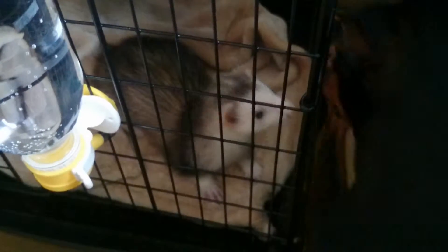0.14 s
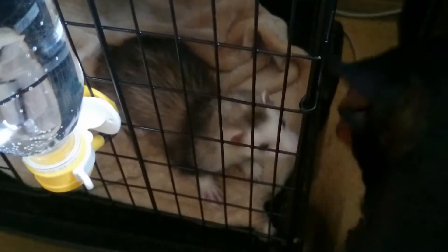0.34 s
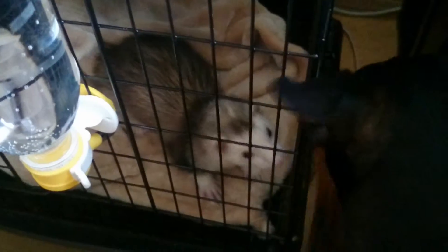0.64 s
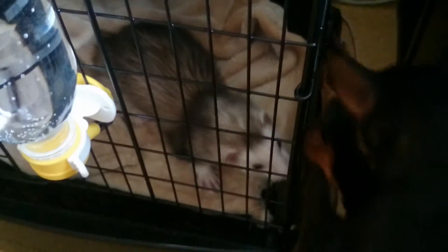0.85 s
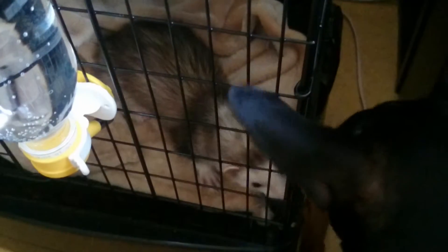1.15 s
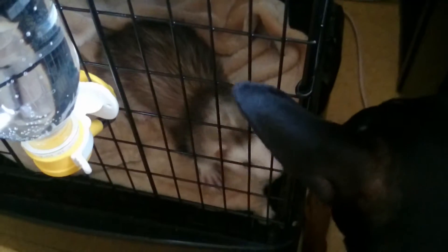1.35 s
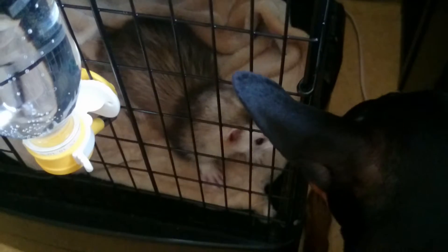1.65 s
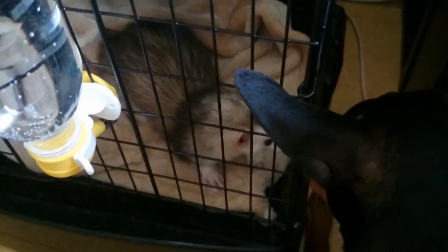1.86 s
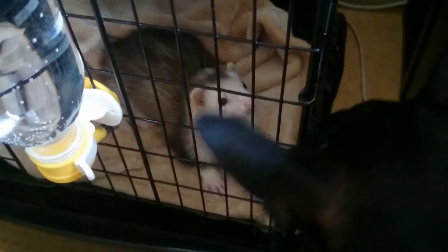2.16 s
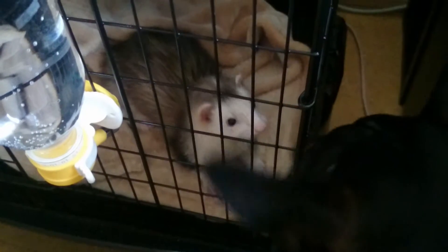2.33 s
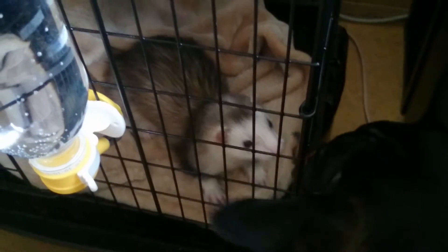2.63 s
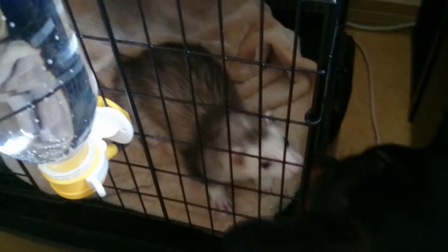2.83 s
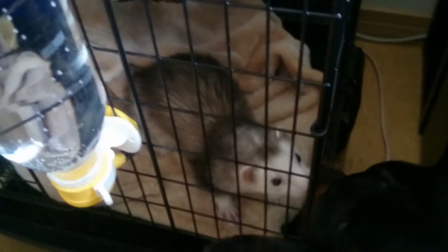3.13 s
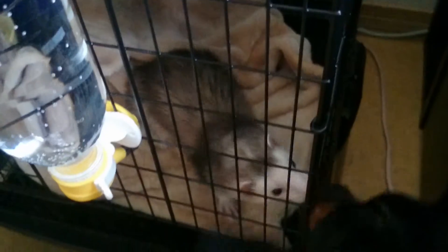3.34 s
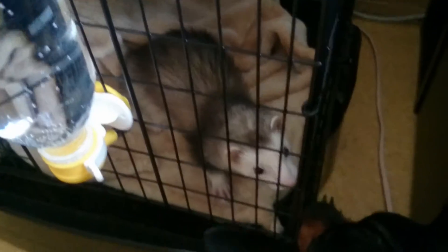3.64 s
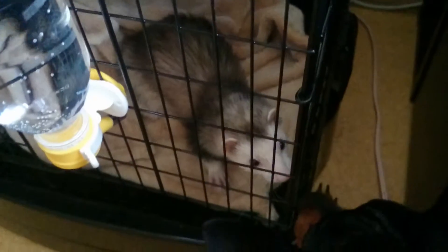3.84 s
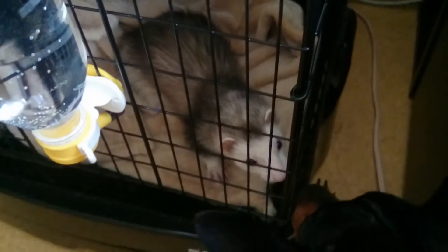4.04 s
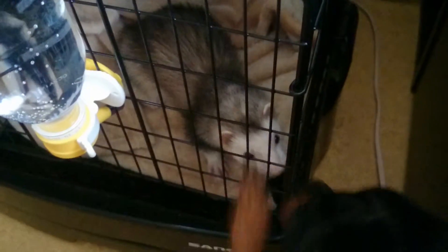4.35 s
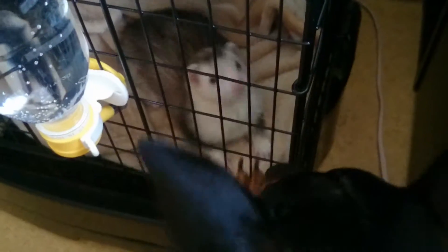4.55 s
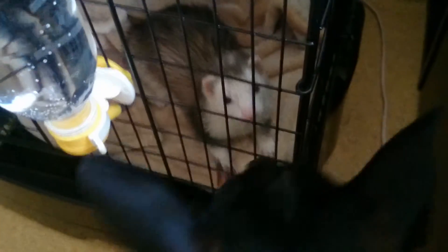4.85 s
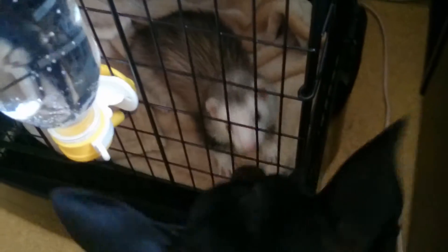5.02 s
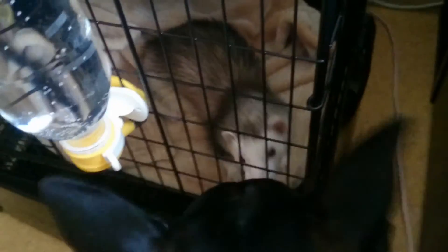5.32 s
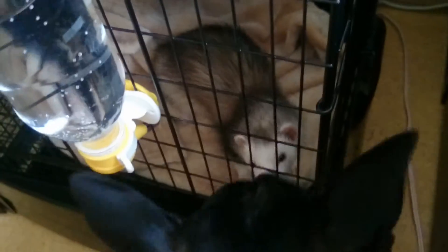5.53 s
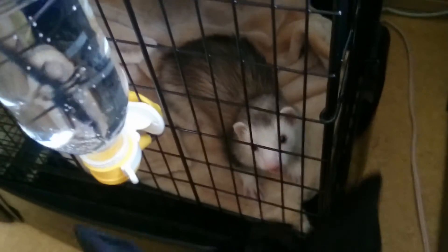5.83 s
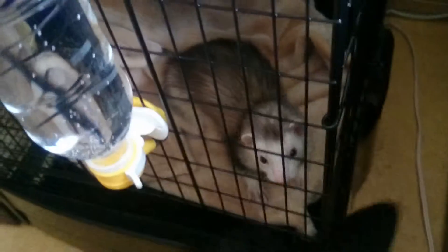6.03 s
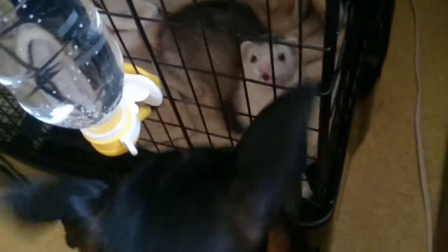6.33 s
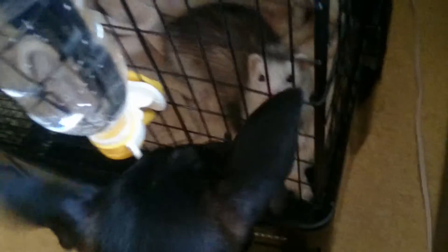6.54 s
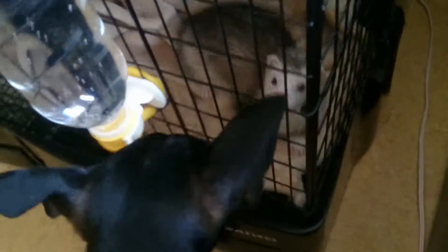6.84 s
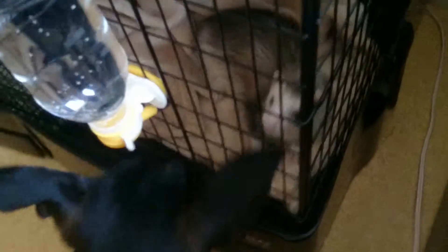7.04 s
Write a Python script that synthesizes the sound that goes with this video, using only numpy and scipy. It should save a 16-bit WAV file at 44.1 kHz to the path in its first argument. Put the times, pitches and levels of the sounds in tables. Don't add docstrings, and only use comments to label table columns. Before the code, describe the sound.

In a small hard room a dog paws and noses at a wire cage on a plastic tray, heard closely through a handheld phone with low grip rumble and faint hiss. From 0 to 0.8 seconds, sharp ticks and small clinks scatter over soft thuds. Around 1.1 a firmer knock and scrape leaves a faint wire ring, then it quietens. At 2.1 a bright, hard rattle cracks out, followed by a swish of fur and a low bump near 2.6. Soft nose puffs come between 2.7 and 3.3. A dense crackling clatter hits at 3.4 to 3.7, then a lull with faint scratches. From 4.5 ticks, scrapes and thuds return, with a bright burst at 5.3 and scattered clicks until 5.9. After a brief pause, another sharp rattle at 6.4, a firm bump at 6.65, then rubbing, thumps and ticks to about 7.2.

```python
import sys
import numpy as np
from scipy import signal
from scipy.fft import rfft, irfft
from scipy.io import wavfile
from scipy.ndimage import uniform_filter1d

SR = 44100
rng = np.random.default_rng(int(sys.argv[2]) if len(sys.argv) > 2 else 0)


def ratio_of_db(decibels):
    return 10 ** (np.asarray(decibels, float) / 20)


def digitize_waveform(pressure):
    field = np.atleast_2d(pressure).T
    bounded = np.clip(field, -1, 1)
    quanta = np.round(bounded * 32767).astype(np.int16)
    wavfile.write(sys.argv[1], SR, quanta)


N = 316638

# time in seconds, level in dB.
GRIP_LEVELS = [(0, -48.5), (.4, -56), (.96, -44.5), (1.24, -45), (1.54, -57.5), (1.9, -59.5), (2.22, -42.5),
               (2.54, -56.5), (2.9, -45.5), (3.3, -55), (3.72, -45.5), (3.86, -51), (4.76, -54),
               (5.0, -46.5), (5.5, -49), (6.1, -48.5), (6.46, -44.5), (7.18, -51)]
# pitch in Hz, time to fall 60 dB in seconds.
ROOM_DECAY = [(200, 0.58), (530, 0.26), (1390, 0.32), (3680, 0.31), (9700, 0.28)]
# pitch in Hz, gain in dB.
WALL_GAIN = [(200, 7), (1500, 3.5), (5600, 1), (8500, -2.5), (14000, -5.5)]
# pitch in Hz, gain in dB.
LEFT_PORT = [(30, -12.5), (300, -2), (1000, -2.5), (3000, -4), (6900, -1), (7900, 6), (9000, 6),
             (10500, -7), (12500, -9.5), (13600, -14.5), (14400, -16.5), (15500, -20.5)]
RIGHT_PORT = [(30, -7.5), (300, -1.5), (1000, -2), (3000, -2.5), (4800, 1.5), (5500, 7), (6100, 7),
              (6700, -4.5), (7700, -14.5), (10000, -20.5), (13300, -29.5), (15500, -24)]
# pitch in Hz, level in dB.
LEFT_HISS = [(30, -54.5), (200, -63.5), (1000, -77), (4000, -87.5), (6900, -82.5), (8000, -72), (9400, -82),
             (10000, -86.5), (12100, -72.5), (13500, -79.5), (15500, -96)]
RIGHT_HISS = [(30, -71), (200, -62.5), (1000, -73), (3000, -80), (6500, -86.5), (7200, -91.5),
              (13000, -86.5), (15500, -89.5)]
# start in seconds, level in dB, pitch in Hz, 60 dB decay in seconds.
WIRE_RINGS = [
    (.854, -52, 985, .3),
    (1.075, -51.5, 985, 1.0),
    (4.72, -58, 990, .3),
]
# start in seconds, level in dB, length in seconds, tray share in dB.
THUDS = [(0.132, -42, 0.026, 1), (0.254, -37.5, 0.039, -2.5), (0.426, -30.5, 0.031, -2),
         (0.488, -45.5, 0.026, 10), (.854, -34, 0.02, 1), (1.053, -26.5, 0.038, 4),
         (2.003, -53, 0.023, -24.5), (2.127, -44, 0.014, -14), (2.229, -39.5, 0.046, -14.5),
         (2.882, -40.5, 0.03, -13.5), (3.067, -43.5, 0.027, -2.5), (3.308, -36.5, 0.04, -2),
         (3.406, -31.5, 0.037, -18), (3.443, -32.5, 0.021, -5), (3.648, -39, 0.035, 0.5),
         (4.605, -44, 0.029, -6.5), (4.708, -44, 0.022, -1.5), (4.897, -37.5, 0.082, -5.5),
         (4.95, -37, 0.019, -2.5), (5, -29.5, 0.023, -7.5), (5.058, -44, 0.079, -1.5),
         (5.119, -38, 0.018, -5), (5.329, -30, 0.029, 4), (5.652, -31, 0.032, -9),
         (5.894, -36.5, 0.018, -4.5), (6.269, -37.5, 0.016, -6), (6.411, -28, 0.017, -3.5),
         (6.799, -35, 0.029, -10), (7, -33.5, 0.067, -47), (7.097, -29.5, 0.07, -15)]
# pitch in Hz, width in Hz, level in dB.
TRAY_MODES = [(333, 78, -6), (462, 130, -11), (790, 29, 1.5), (940, 61, -11)]
# start in seconds, level in dB, left over right in dB.
BUMPS = [
    (2.583, -21, -4),
    (5.969, -39.5, -23.5),
    (6.653, -25.5, -6),
]
# pitch in Hz, level in dB, 60 dB decay in seconds.
FLOOR_MODES = [(61.5, 15, 0.15), (190, 4, 0.1), (302, -5, 0.086), (470, 2, 0.075), (600, -8.5, 0.06)]
# start in seconds, hold in seconds, fur hiss in dB, pad drag in dB,
# fine-hair sheen over the hiss in dB.
RUBS = [(0, 0.0031, -37, -48.5, -7), (0.197, 0.09, -63, -42.5, -.5), (0.393, 0.095, -40, -65, -.5),
        (.86, 0.25, -54, -61, -.5), (1.086, 0.043, -61, -41, -.5), (2.233, 0.087, -22.5, -42, 2.5),
        (2.358, 0.13, -32, -46, -0.5), (2.55, 0.076, -60, -57, -2), (2.724, 0.53, -56, -54.5, 0),
        (3.369, 0.17, -35, -44, 7), (3.6, 0.033, -68, -59, -.5), (3.896, 0.96, -72, -64.5, 2),
        (4.602, 0.091, -56, -47, -.5), (4.694, 0.2, -42, -64, 1), (4.873, 0.087, -28.5, -40, -9),
        (5.034, 0.45, -69, -48.5, -3), (5.437, 0.15, -54, -41, -.5), (5.67, 0.11, -32, -37.5, 3),
        (5.845, 0.093, -42, -49, -4), (6.0, 0.25, -71, -61, 0), (6.243, 0.034, -62, -67, -.5),
        (6.324, .12, -62, -44, -.5), (6.438, 0.016, -51, -29.5, -.5), (6.512, 0.028, -70, -38, -.5),
        (6.646, 0.11, -35, -42.5, 4), (6.8, 0.064, -28.5, -40, -2), (6.902, 0.26, -41.5, -44, 1),
        (7.128, 0.058, -27, -38, 0)]
# start in seconds, blow in dB, low share in dB, top share in dB,
# length in seconds.
SNIFFS = [
    (2.702, -40, -10.5, -9, 0.033),
    (2.866, -42, -13.5, -6.5, 0.049),
    (3.049, -41, -5, -17, 0.035),
    (3.296, -41.5, -6.5, -4.5, 0.023),
    (4.46, -45.5, -12.5, -17, 0.073),
]
# pitch in Hz, width in Hz.
NOSTRIL_GAPS = [(1700, 630), (3200, 540), (4650, 500)]
# start in seconds, level in dB, panel pitch in Hz,
# length in seconds.
PANEL_RAPS = [
    (.5, -42, 1360, 0.0083),
    (0.855, -35, 960, 0.014),
    (1.065, -24.5, 946, 0.032),
    (2.122, -21, 1460, 0.0047),
    (3.442, -33, 934, 0.015),
    (3.655, -25, 1475, 0.0079),
    (4.725, -34, 1030, 0.061),
    (5.32, -24.5, 790, 0.005),
    (5.66, -30.5, 865, 0.014),
]
# start in
# seconds, level in dB, pitch in Hz, length in seconds.
SMALL_KNOCKS = [(.046, -48, 570, 0.0098), (.063, -43, 5300, 0.0066), (.075, -47, 690, 0.018),
                (.105, -52, 650, 0.013), (.136, -41, 2500, .005), (.172, -58, 510, .012),
                (.243, -40, 2420, 0.0042), (.260, -15, 3500, 0.0046), (.441, -26, 8500, .003),
                (.467, -24, 11000, .003), (.476, -13, 6000, 0.0036), (.494, -20, 8340, .003),
                (.728, -46, 5750, .003), (.853, -29.5, 2480, 0.0051), (1.069, -31, 9500, 0.0023),
                (1.093, -36, 5800, 0.0052), (1.103, -28.5, 480, 0.011), (1.28, -56, 520, .05),
                (2.143, -9, 5800, 0.0077), (2.165, -41.5, 483, .012), (2.226, -23.5, 8450, .006),
                (2.268, -20, 8160, 0.012), (2.604, -52, 8000, .004), (3.298, -48, 486, 0.011),
                (3.418, -39, 2980, .004), (3.457, -11, 5650, 0.0037), (3.467, -18, 5600, .003),
                (3.476, -18, 5460, .003), (3.487, -25, 5640, .005), (3.502, -30, 5600, .003),
                (3.605, -25, 992, 0.0092), (3.677, -17, 5900, 0.0031), (3.762, -26.5, 3860, 0.0033),
                (5.324, -11, 9060, 0.0054), (5.364, -27, 5700, .004), (5.412, -41, 2500, .005),
                (5.552, -37, 1210, 0.0087), (5.757, -16.5, 9600, .006), (5.830, -18, 2430, 0.0075),
                (6.409, -19, 8700, 0.0044), (6.419, -12.5, 8700, 0.0055), (6.448, -38, 535, .012),
                (6.452, -10.5, 5700, 0.0034), (6.704, -45, 2800, .005), (6.988, -28, 2350, 0.0044),
                (7.076, -32, 9500, .002), (7.100, -36, 4000, 0.0035), (7.155, -47, 550, .012),
                (0.263, -26, 1000, .01), (0.753, -41, 1310, .01), (.856, -22, 1026, .02),
                 (1.081, -25.5, 1020, 0.022), (1.314, -53, 2300, .04), (2.866, -45.5, 5590, 0.093),
                 (2.702, -43, 5800, .05), (3.055, -38, 5230, .06), (3.5, -36, 203.3, .06),
                 (3.69, -29, 2090, 0.024), (3.7, -39.5, 4300, .03), (4.255, -56, 1380, 0.017),
                 (4.942, -29.5, 985, 0.032), (5.312, -10, 9340, 0.0097), (5.648, -33.5, 186, 0.0075),
                 (5.675, -38, 300, 0.0084), (5.7, -48, 220, 0.014), (5.91, -52.5, 498, .015),
                 (6.656, -38.5, 345, 0.0096), (7.105, -36.5, 306, .015), (0.49, -17.5, 3120, 0.0068),
                 (.772, -33.5, 1750, .01), (0.776, -32, 2724, .01), (0.856, -27, 2550, .006),
                 (2.881, -43, 2390, .05), (3.1, -46, 2500, .09), (3.08, -44.5, 3960, 0.082),
                 (3.665, -33, 1490, 0.017), (4.363, -44, 7100, .0015), (4.736, -25, 2380, 0.018),
                 (5.334, -34, 765, 0.014), (5.903, -25, 4970, .002), (5.904, -39, 9600, .002),
                 (6.272, -39, 2970, .003), (6.87, -46, 4700, 0.028), (6.913, -45, 9000, .003),
                 (6.96, -28, 8800, .012), (7.162, -40, 9000, .002),
                (4.262, -49, 964, 0.014), (4.264, -45, 2700, .012), (4.266, -53, 3450, .01),
         (4.298, -49, 5600, .02), (4.31, -54, 9500, .0015), (4.8, -42, 3500, .002), (4.8, -46, 3000, .02),
         (3.432, -10.5, 3800, .002), (3.433, -19, 8100, .003), (3.442, -18, 3200, .004),
         (3.44, -24.5, 1000, 0.013), (3.7, -36, 2150, 0.034), (3.62, -38.5, 910, 0.031),
         (.452, -20, 5600, .003), (0.44, -18, 3700, .007), (6.83, -26, 4700, .02),
         (6.795, -22, 8100, 0.013), (6.91, -42, 12000, .0015), (6.988, -40, 9000, .002),
         (2.134, -20, 10500, 0.0027), (2.87, -55, 4700, 0.036), (2.2, -48, 2500, .03),
         (2.584, -44, 1320, .002), (5.322, -32, 201, 0.044), (5.335, -30, 480, .01)]
SHARE_HZ = [1600, 5600, 8500, 13000]
USUAL_DB = [7.73, 2.26, 1.4, 17.6]
# pitch in Hz, width in Hz, level in dB.
TRAY_WALL_MODES = [(993, 180, 2.5), (2300, 480, -2.5)]
# start in seconds, blow in dB, tray share in dB,
# length in seconds.
WIRE_SCRAPES = [(0.262, -35, 9, 0.0017), (0.426, -41, 5, 0.0065), (0.851, -36.5, 9, 0.005),
                (3.455, -17, -53, 0.016), (4.235, -52, -15, 0.044), (4.261, -48.5, -2, 0.0054),
                (4.302, -52, -12, 0.0033), (4.718, -26, -16, 0.0096), (4.734, -25.5, -13, 0.011),
                (6.194, -50.5, 0.5, 0.066), (6.254, -45.5, -12, 0.01), (6.691, -37, -1, 0.0089)]
FRAME_SCRAPES = [(.24, -32.5, -2.5, 0.0031), (0.39, -49, 10, 0.0095), (1.06, -28.5, -0.5, 0.012),
                 (1.09, -30.5, 0, 0.0026), (2.031, -59.5, -8, 0.02), (2.24, -29.5, -21, 0.019),
                 (3.381, -35.5, -16.5, 0.037), (3.604, -46, 6.5, 0.0064), (4.933, -44.5, 0.5, 0.024),
                 (5.31, -37, -11.5, 0.0057), (5.325, -18, -12, 0.018), (5.646, -43, 1, 0.013),
                 (5.752, -32, -23, 0.0047), (6.403, -37, -24, 0.0096), (6.424, -17.5, -7, 0.0069)]
# wire share in dB, claw-tip share in dB.
SCRAPE_SHARES_DB = [(2, -8.5), (-4, -8)]
# time of the top in seconds, blow in dB,
# tray share in dB, wire share in dB, room share in dB.
WIRE_TICKS = [(0.2589, -19.5, -22, 4.5, -2.5), (0.4998, -17.5, -6.5, 4, -3.5), (0.7714, -36, -5, 5, -1),
              (1.074, -14.5, -17, -1, -0.5), (1.1429, -28, -5, 12, -10.5), (3.432, -12, -11, 1.5, 0),
              (3.444, -13.5, -8.5, 5.5, -11.5), (3.76, -43, -2, 18.5, -7.5), (4.3649, -49.5, -5, 14, -8),
              (4.726, -33.5, -9, 13.5, -1.5), (5.834, -29, -5, 6.5, -1), (5.905, -35.5, -2, 20.5, -10.5),
              (6.4128, -15.5, -12.5, 4, 1), (7.0603, -32, -7, 2, -5.5)]
TIP_TICKS = [(0.4386, -16.5, -10, -4, -4.5), (0.452, -13, -20, -1, -0.5), (1.0589, -30.5, -18, 6.5, -4),
             (2.121, -12, -20, 2, -1.5), (2.1461, -16.5, -15.5, 2, 1), (3.6535, -11, -13.5, 1.5, -2.5),
             (4.497, -26, -27, -4.5, 2), (4.6163, -33.5, -7, -2, 1), (4.8343, -34.5, -10, -5, 1.5),
             (5.011, -27.5, -16, -3.5, 4), (5.0769, -30.5, -11, 2, -0.5), (5.318, -18, -19, 2, 1.5),
             (5.4208, -23, -9.5, 0.5, -0.5), (5.442, -21.5, -11.5, -3.5, -5), (5.5288, -26.5, -43, 0.5, 5),
             (5.662, -27.5, -16.5, -0.5, 4.5), (5.7468, -22, -16, -10, -3.5), (6.8279, -20.5, -14, 0, -2.5),
             (6.959, -28, -25, -9.5, 4), (7.105, -33.5, -1, 2, 3), (7.1667, -36, -11, -11, -10.5)]
BLUNT_TICKS = [(0.1296, -17, -17, -7, -2), (0.706, -26, -20, -3, 1.5), (2.1345, -20.5, -6, -41, 1),
               (3.422, -25, -13, -9.5, 14), (3.6141, -14, -18.5, -1, -4), (4.511, -24.5, -17, -4.5, 4),
               (4.848, -18, -23, -19, 1.5), (5.0594, -28, -9, -2, 4), (5.1744, -24.5, -20.5, -9.5, 2.5),
               (6.2808, -39, -10, -7, 5), (6.3056, -32.5, -6.5, -2, 3), (6.3834, -39.5, -7, -7, -5.5),
               (6.6155, -28.5, -16.5, -9, 4), (6.6437, -31.5, -12, 1, 1), (6.7966, -24, -10, -9, 1),
               (6.9966, -29, -11, 1, 3.5)]
TIP_SHARES_DB = [-6, -3.5, -8.5]

PLACES = 5
RIGHT_LAG = 12


def read(points, hz):
    f, value = np.transpose(points)
    return np.interp(np.log(hz + 1), np.log(f + 1), value)


def curve(rows):
    s, value = np.transpose(list(rows))
    return np.interp(np.arange(N) / SR, s, value)


def evened(x):
    return x / np.sqrt(np.mean(x ** 2) + 1e-20)


def add(mix, s, sound):
    part = mix[..., round(s * SR):][..., :sound.shape[-1]]
    part += sound[..., :part.shape[-1]]


def colour(x, points, size=2048):
    log_gain = np.log(ratio_of_db(read(points, abs(np.fft.fftfreq(size, 1 / SR)))))
    spectrum = np.exp(np.conj(signal.hilbert(log_gain)))
    taps = np.fft.ifft(spectrum).real[:size // 2]
    return signal.oaconvolve(x, taps)[:len(x)]


def resonate(x, hz, width):
    return signal.lfilter(*signal.iirpeak(hz, hz / width, SR), x)


def crackle(count, spread_db):
    slips, clumps = rng.standard_normal((count, 2)).T
    return evened(slips * ratio_of_db(spread_db * evened(uniform_filter1d(clumps, 50))))


def levelled(burst, shape):
    z = rfft(burst)
    power = uniform_filter1d(abs(z) ** 2, size=len(burst) // 300)
    z = z / (power + 1e-12) ** 0.125
    return irfft(z, len(burst)) * np.minimum(4 * shape / shape.max(), 1)


def touch(shape, spread_db, db, tray_db, wire_db, tip_db):
    burst = levelled(crackle(len(shape), spread_db) * shape, shape)
    burst = burst * np.linalg.norm(shape) / np.linalg.norm(burst)
    burst = burst + sum(ratio_of_db(level_db) * resonate(burst, hz, width) for hz, width, level_db in TRAY_WALL_MODES)
    shares = np.add([tray_db, wire_db, 0, tip_db], USUAL_DB)
    points = [(150, shares[0] - 14), *zip(SHARE_HZ, shares)]
    return ratio_of_db(db + 8) * colour(burst, points, size=512)


def jolts():
    out, t = np.zeros(N), np.arange(9000) / SR / 0.022
    for s, db, *_ in THUDS:
        add(out, s, ratio_of_db(db + 17.5) * t * np.exp(1 - t))
    return 1 + out


def hand():
    shape = [(10, 0.0), (25, 0.5), (45, -9.0), (90, -17.0), (200, -32.5), (600, -64.0)]  # (Hz, dB)
    left, right = (evened(colour(v, shape, size=16384)) for v in rng.standard_normal((N, 2)).T)
    rumble = np.array([0.66 * left + 0.17 * right, right])
    return rumble * ratio_of_db(curve(GRIP_LEVELS) + [[1.5], [15.]]) * jolts()


def room(x):
    taps = np.zeros((2, SR // 2))
    at = np.arange(200, SR // 2 - 20, 20) + rng.integers(0, 20, (2, (SR // 2 - 201) // 20))
    np.put_along_axis(taps, at, rng.choice([-1., 1.], at.shape), 1)
    hz, t, z = signal.stft(taps, SR, nperseg=256)
    same = np.clip(1.25 - hz / 1600, 0, .82)[:, None]
    z[1] = same * z[0] + np.sqrt(1 - same ** 2) * z[1]
    fade = ratio_of_db(-60 * t / read(ROOM_DECAY, hz)[:, None])
    fade = fade * (1 - np.exp(-t / 0.0017))
    gain = ratio_of_db(read(WALL_GAIN, hz))[:, None] / np.linalg.norm(fade, axis=1).mean()
    tail = signal.istft(z * fade * gain, SR, nperseg=256)[1]
    tail[1] = np.roll(tail[1], RIGHT_LAG)
    return signal.fftconvolve(x[None], 0.35 * tail, axes=1)[:, :N]


def far_port(x):
    taps = np.diff(rng.standard_normal(120) * np.exp(-np.arange(120) / 30))
    bass = signal.lfilter(*signal.butter(2, 1300, fs=SR), x)
    scattered = signal.oaconvolve(x - bass, taps / np.linalg.norm(taps))[:N]
    return np.roll(0.26 * x + 0.45 * bass + 0.84 * scattered, 1)


def wire():
    out, t = np.zeros(N), np.arange(SR) / SR
    for s, db, hz, t60 in WIRE_RINGS:
        tones = np.sin(2 * np.pi * hz * t)
        tones = tones + .3 * np.sin(2 * np.pi * (hz + 7) * t)
        tones = tones + .15 * np.sin(2 * np.pi * (hz - 19) * t)
        add(out, s, ratio_of_db(db - 60 * t / t60) * tones)
    return out


def rubbing():
    rise, fall, rest_db = 298.5, 209, -79.5
    t, out = np.arange(N) / SR, np.full((3, N), ratio_of_db(rest_db))
    for s, hold, hiss_db, drag_db, sheen_db in RUBS:
        loss_db = rise * np.maximum(s - t, 0) + fall * np.maximum(t - s - hold, 0)
        out = np.maximum(out, ratio_of_db([[hiss_db], [drag_db], [hiss_db + sheen_db]]) * ratio_of_db(-loss_db))
    return out


def shuffle():
    fur, pads, sheen = rubbing()
    fur_colour = [(1500, -25.5), (4500, -10.5), (7500, -3.5), (15000, 8.5)]  # (Hz, dB)
    pad_colour = [(150, -15.0), (900, -7.0), (4000, -7.5), (8000, -17.0)]
    hiss = [colour(crackle(N, 2.8), fur_colour, size=256) for _ in range(PLACES)]
    drag = [colour(crackle(N, 6.7), pad_colour, size=256) for _ in range(PLACES)]
    sheen_hz = 10500
    fine = signal.lfilter(*signal.butter(3, sheen_hz, "high", fs=SR), hiss)
    coarse = signal.lfilter(*signal.butter(3, sheen_hz, fs=SR), hiss)
    return ratio_of_db(-13.0) * (fur * coarse + sheen * fine) + ratio_of_db(1.0) * pads * np.array(drag)


def sniffs():
    out, t = np.zeros((PLACES, N)), np.arange(6000) / SR
    for k, (s, db, low_db, top_db, length) in enumerate(SNIFFS):
        shape = (1 - np.exp(-t / 0.0016)) * np.exp(-(t / length) ** 1.28)
        puff = touch(shape, 1.3, db, low_db, -3.5, top_db)
        for hz, width in NOSTRIL_GAPS:
            puff = puff - 0.59 * resonate(puff, hz, width)
        add(out[k % PLACES], s, puff)
    return out


def thud(db, length, tray_db):
    t = np.arange(9000) / SR
    hz = 123.4 * ratio_of_db(0.2 * tray_db)
    push = rng.standard_normal(len(t)) + 1.21 * (t < .003)
    push = push * (1 - np.exp(-t / 0.017)) * np.exp(-t / max(length, .004))
    push = uniform_filter1d(uniform_filter1d(push, size=24), size=17)
    body = evened(resonate(resonate(push, hz, 1.5 * hz), hz, 2.4 * hz))
    tray = evened(sum(ratio_of_db(level_db) * resonate(push, f, width) for f, width, level_db in TRAY_MODES))
    body = body + ratio_of_db(tray_db) * tray
    pan_db = -1 * np.array([[.5], [-.5]])
    return ratio_of_db(db + pan_db + 6.5) * body / abs(body).max()


def bump(db, pan_db):
    t = np.arange(9000) / SR
    sag = 0.7 * (1 - np.exp(-t / 0.0084))
    ring = np.zeros(len(t))
    for k, (hz, level_db, t60) in enumerate(FLOOR_MODES):
        ring += ratio_of_db(level_db - 60 * t / t60) * np.sin(2 * np.pi * (hz * t + sag * (k == 0)))
    ring = ring * (1 - np.exp(-t / 0.0021))
    return ratio_of_db(db + pan_db * np.array([[.5], [-.5]]) + 2.5) * ring / abs(ring).max()


def raps(rows, sharpness):
    out, t = np.zeros(N), np.arange(8000) / SR
    for s, db, hz, length in rows:
        push = rng.standard_normal(len(t)) * (1 - np.exp(-t / 0.0018)) * np.exp(-t / max(length, .001))
        ring = resonate(resonate(push, hz, hz / sharpness), hz, hz / sharpness)
        add(out, s, ratio_of_db(db) * ring / abs(ring).max())
    return out


def rebounds():
    x = raps(SMALL_KNOCKS, 5.1)
    return np.array([x, far_port(x)]) + room(ratio_of_db(-9) * x)


def scrapes():
    out, t = np.zeros((PLACES, N)), np.arange(6000) / SR
    for rows, shares in zip([WIRE_SCRAPES, FRAME_SCRAPES], SCRAPE_SHARES_DB):
        for k, (s, db, tray_db, length) in enumerate(rows):
            length = max(length, .001)
            shape = (1 - np.exp(-t / (22 * length ** 2))) * np.exp(-t / length)
            add(out[k % PLACES], s, touch(shape, 1.976, db, tray_db, *shares))
    return out


def ticks():
    near, far, t = np.zeros((PLACES, N)), np.zeros((PLACES, N)), np.arange(1500) / SR
    steep = 1.76
    for rows, tip_db in zip([WIRE_TICKS, TIP_TICKS, BLUNT_TICKS], TIP_SHARES_DB):
        for k, (s, *levels, room_db) in enumerate(rows):
            rise = .0038 * ratio_of_db(.3 * room_db)
            linger = 0.0069 * ratio_of_db(room_db)
            shape = (t / rise) ** steep * np.exp(steep * (1 - t / rise))
            after_slips = 0.42 * (t > rise) * np.exp(-(t - rise) / linger)
            tick = ratio_of_db(-5) * touch(np.maximum(shape, after_slips), 1.0, *levels, tip_db)
            add(near[k % PLACES], s - rise, tick)
            add(far[k % PLACES], s - rise, ratio_of_db(room_db) * tick)
    return near, far


def scene():
    thuds, bumps = np.zeros((2, N)), np.zeros((2, N))
    for s, *row in THUDS:
        add(thuds, s, thud(*row))
    for s, *row in BUMPS:
        add(bumps, s, bump(*row))
    thuds[1] = np.roll(thuds[1], RIGHT_LAG)
    rough = scrapes() + shuffle() + sniffs()
    rough[1] += raps(PANEL_RAPS, 2.5)
    near, far = ticks()
    near = near + rough
    near[0] += ratio_of_db(9) * wire()
    direct = np.array([near.sum(0), sum(far_port(x) for x in near)])
    echoes = sum(room(x) for x in ratio_of_db(1.5) * rough + far)
    echoes = echoes + room(ratio_of_db(-10.0) * thuds[0] + ratio_of_db(-12.5) * bumps[0])
    return direct + thuds + bumps + echoes + hand() + rebounds()


def top_cut(x):
    return signal.sosfilt(signal.butter(12, 16670, fs=SR, output="sos"), x)


def record(dry):
    heard = np.array([colour(dry[0], LEFT_PORT), colour(dry[1], RIGHT_PORT)])
    noise = rng.standard_normal((N, 2)).T
    hiss = np.array([colour(noise[0], LEFT_HISS), colour(noise[1], RIGHT_HISS)])
    heard = heard + ratio_of_db(12.5) * hiss
    band_limit = signal.firwin(511, 15800, window=("kaiser", 6), fs=SR)
    heard = signal.oaconvolve(heard, band_limit[None], "same")
    return top_cut(np.clip(heard, -1, 1))


dry = scene()
out = record(dry)
digitize_waveform(out)
```